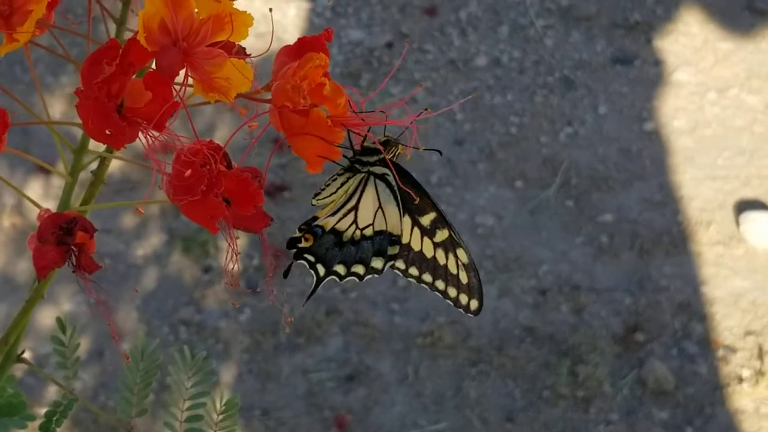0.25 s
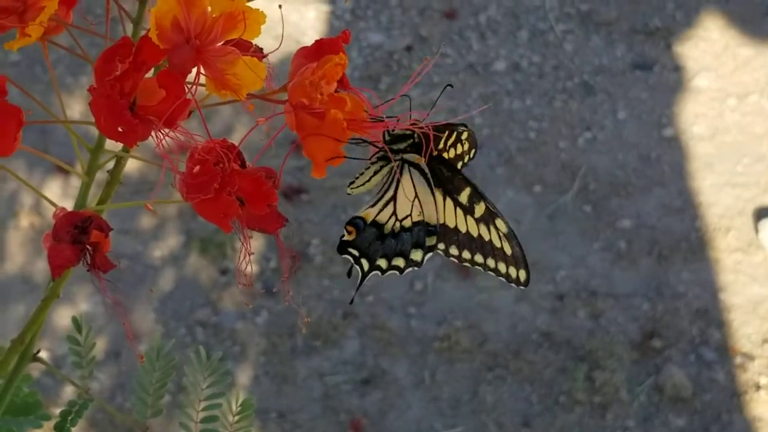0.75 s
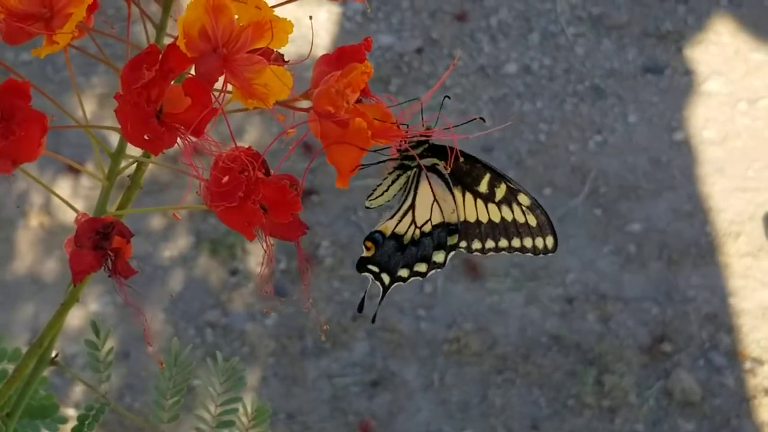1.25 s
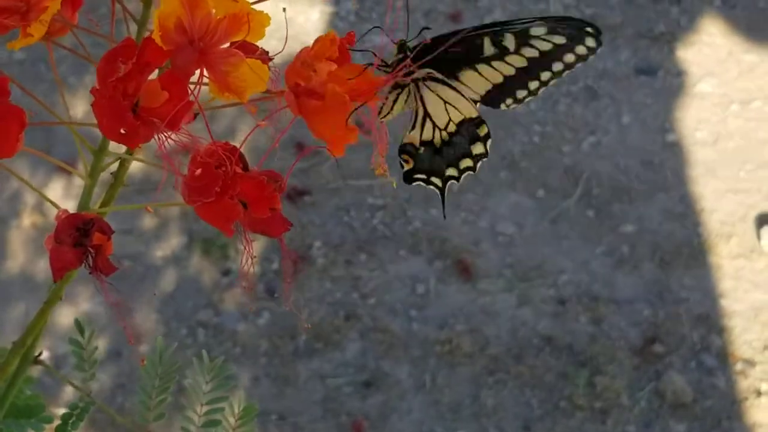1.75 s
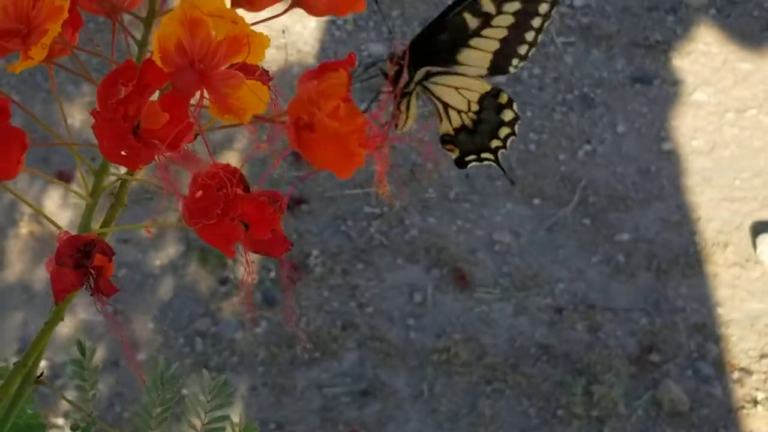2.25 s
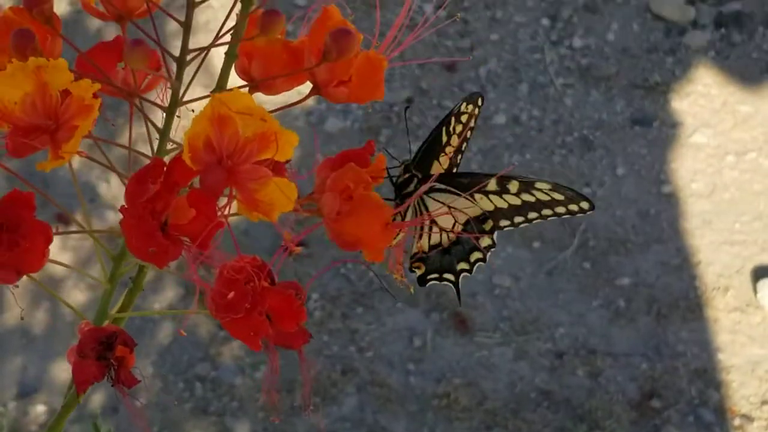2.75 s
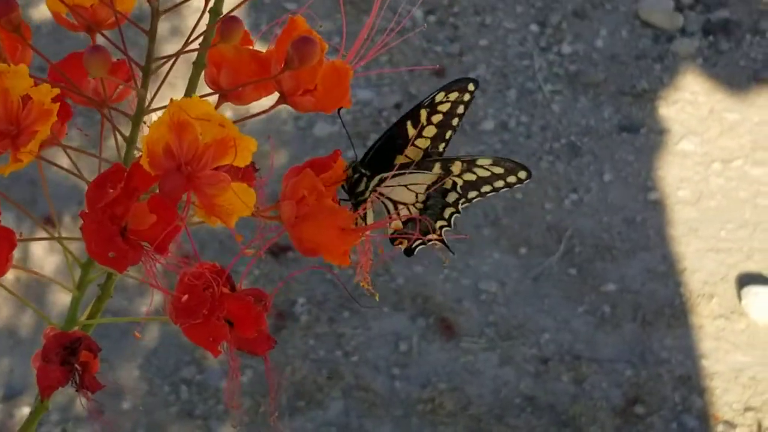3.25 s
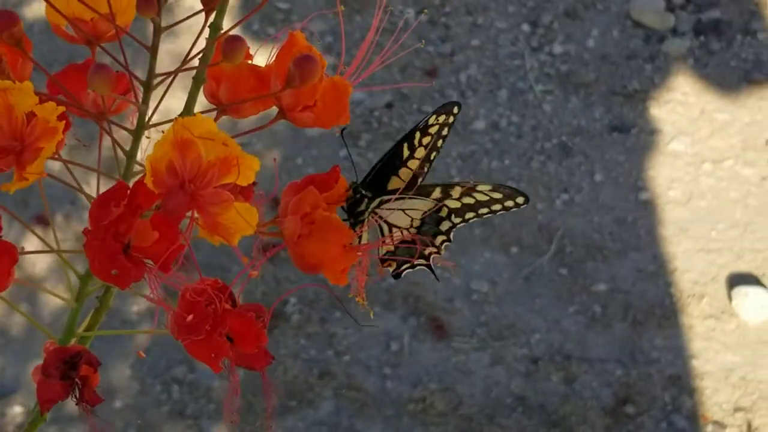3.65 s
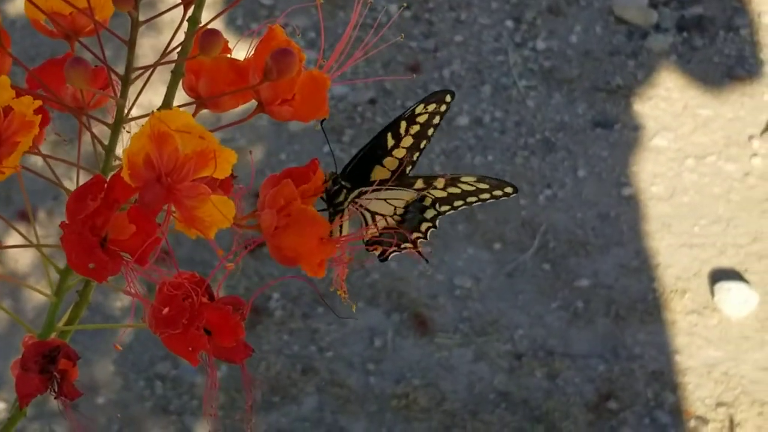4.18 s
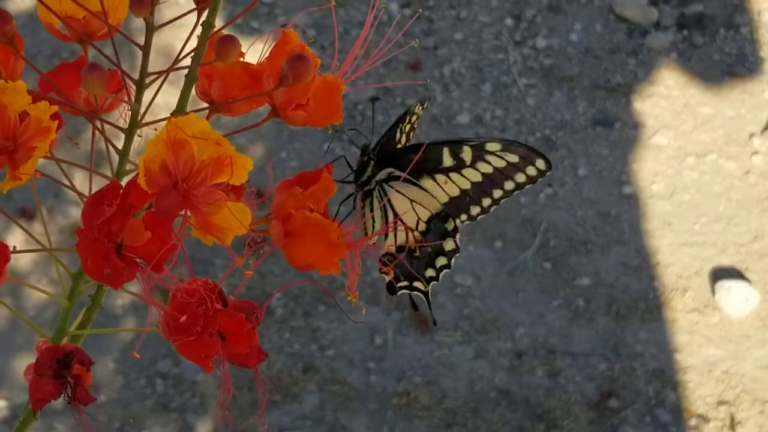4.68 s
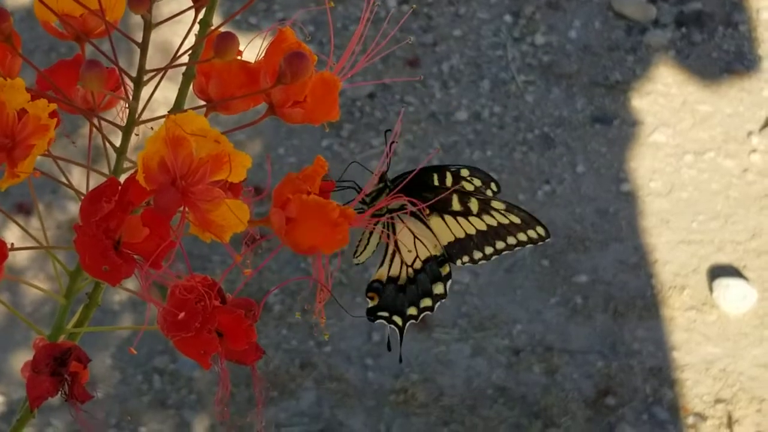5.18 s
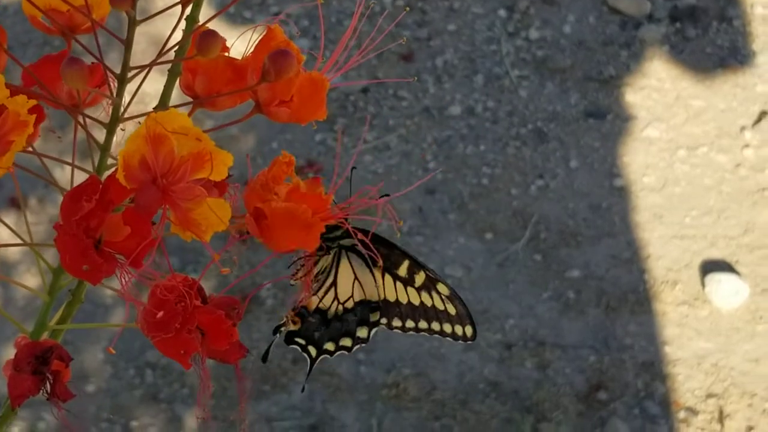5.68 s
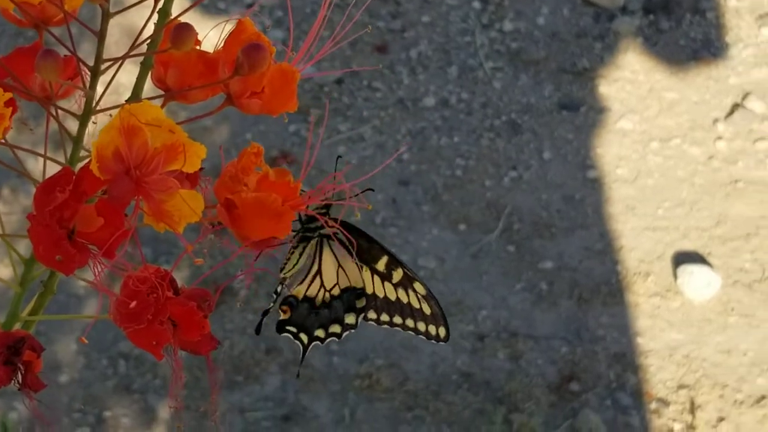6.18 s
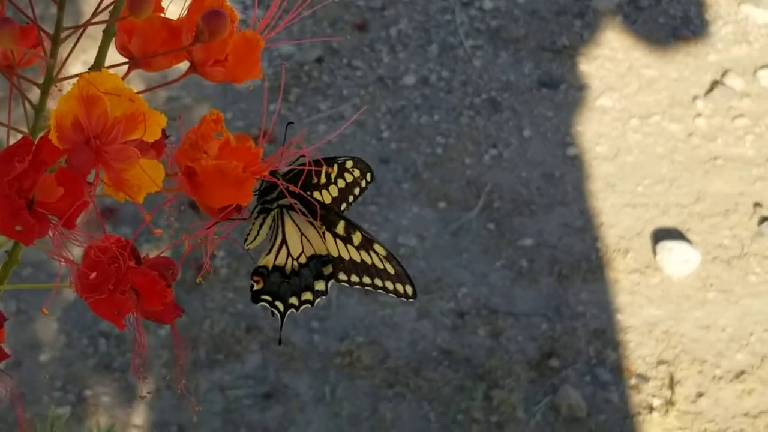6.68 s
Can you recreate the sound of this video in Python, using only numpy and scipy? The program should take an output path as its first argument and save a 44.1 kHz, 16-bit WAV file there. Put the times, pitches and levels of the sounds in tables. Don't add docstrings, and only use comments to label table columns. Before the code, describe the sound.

Outdoors near a road, a distant heavy engine drones up with a faint whine, lifts off at about one and a half seconds, changes gear and climbs softly again. Steady low traffic rumble lies under it. A nearer vehicle's tyre roar swells late and leans right. A faint leafy wash, light hiss and a few tiny ticks come through a small handheld stereo recorder.

```python
import sys
import numpy as np
from scipy import signal
from scipy.io import wavfile
from scipy.ndimage import uniform_filter1d

SR = 44100
rng = np.random.default_rng(int(sys.argv[2]) if len(sys.argv) > 2 else 0)


def transcribe(u):
    v = np.clip(np.atleast_2d(u).T, -1, 1)
    q = np.round(v * 32767).astype(np.int16)
    wavfile.write(sys.argv[1], SR, q)


def gain_from_decibels(decibels):
    exponent = np.asarray(decibels, float) / 20
    return 10 ** exponent


N = 305613

HOP, SIZE = 512, 2048
FRAMES = N // HOP + 6
HZ = np.fft.rfftfreq(SIZE, 1 / SR)
FRAME_S = np.arange(FRAMES) * HOP / SR
TIME_S = np.arange(N) / SR
STEP = 16
SLOW_S = np.arange(N // STEP + 1) * STEP / SR

# time in seconds, level in dB.
LOW_GEAR = [
    (0, -42.5),
    (.06, -39.5),
    (.23, -35.5),
    (.74, -32.5),
    (.92, -35.5),
    (1.2, -32),
    (1.315, -29.5),
    (1.47, -39),
    (1.57, -54.5),
]
# time in seconds, pitch in Hz, level in dB.
WHINE = [
    (0, 255.3, -56.1),
    (0.25, 271.2, -55.8),
    (0.5, 278.4, -51.5),
    (0.75, 286.2, -51.5),
    (1, 285.9, -49.6),
    (1.2, 282.9, -50.3),
    (1.35, 271.8, -52.6),
    (1.5, 272.0, -59.4),
]
# time in seconds, cycle rate in Hz.
NEXT_GEAR = [
    (1.6, 11.9),
    (2.1, 12.19),
    (4.1, 13.73),
    (4.6, 13.94),
    (5.1, 14.12),
    (5.6, 14.12),
    (6, 14),
]
# order, start in seconds, end in seconds, peak in dB.
LOW_ORDERS = [(8, 2.64, 3.75, -48.5), (8, 3.55, 4.82, -51), (8, 4.85, 5.68, -49.5), (10, 1.9, 3.1, -54),
              (10, 2.45, 2.9, -52), (10, 2.9, 3.64, -43), (10, 3.61, 4.07, -47), (10, 4.14, 4.6, -49),
              (10, 4.2, 5.85, -52.5), (11, 1.1, 3.3, -50), (11, 3, 4, -52.5), (11, 3.8, 5.2, -54.5)]
# order, start in seconds, end in seconds, peak in dB.
UPPER_ORDERS = [(22, 1.9, 3.8, -53.5), (22, 3.34, 4.7, -56.5), (19, 2.77, 4.25, -50), (21, 2.8, 3.5, -62),
                (21, 3.8, 5.9, -55), (20, 4.33, 5.86, -51.5), (18, 3, 5.6, -56.5), (19, 4.6, 5.9, -53)]
# time in seconds, depth in dB, half length in seconds.
ENGINE_DIPS = [
    (.35, 2, 0.17),
    (.79, 4, 0.031),
    (1.075, 3, 0.028),
    (1.415, 3, 0.018),
]

# frequency in Hz, density in dB per Hz.
RUMBLE = [(15, -38), (25, -20), (49, -1.5), (97, -3.5), (134, -2), (186, -10.5), (220, -10.5), (261, -6.5),
          (350, -18), (378, -14.5), (469, -23), (781, -33), (1000, -51.5), (1300, -73.5), (2200, -120)]
# time in seconds, change in dB, half length in seconds.
SURGES = [(0, -3.5, .1), (.9, -3, .1), (1.07, 4, 0.055), (2.0, 1.5, .4), (2.79, 2.5, .05),
          (3.35, -2.5, 0.49), (3.94, 4, .06), (4.7, 2, .15), (4.87, -2.5, .05), (5.1, 3.5, 0.17),
          (5.68, 5.5, 0.11), (5.84, -1, .04), (6.3, 1.5, 0.52), (6.93, 9, 0.046)]
# start in seconds, end in seconds, frequency in Hz, width in Hz, level in dB.
DRONES = [(1.6, 3.2, 56, 6, -51), (2.6, 4.2, 55, 6, -53), (3.9, 6, 55, 6, -50), (.4, 1.5, 93, 7, -52),
          (4.7, 6, 98, 9, -48), (2.6, 3.4, 204, 6, -58), (3.5, 5.6, 202, 8, -54), (5.4, 7.2, 204, 6, -56),
          (-.1, .5, 251, 8, -52), (1.4, 1.9, 252, 10, -49), (4, 5.9, 251, 8, -54), (5.8, 7.4, 249, 9, -50),
          (.6, 1.5, 385, 8, -63), (1.6, 2.6, 382, 8, -63), (3, 3.9, 390, 10, -60),
          (1.55, 2.15, 129, 10, -49.5)]

# frequency in Hz, density in dB per Hz.
TYRES = [(130, -30), (220, -10), (251, -7.5), (290, -17), (325, -4), (454, -14), (711, -13), (787, -9.5),
         (1020, -21), (1400, -19.5), (1900, -36), (2580, -40), (3540, -49), (4220, -45), (7000, -67.5),
         (9100, -99.5), (15400, -120)]
# frequency in Hz, width in Hz, level in dB.
TREAD = [(769, 43, 3), (600, 92, 0), (1142, 53, 2.5)]
# time in seconds, level in dB.
APPROACH = [(0, -73.5), (0.499, -78), (1, -68), (1.55, -67.5), (2, -65), (2.45, -61.5), (2.7, -66),
            (3.15, -60.5), (3.55, -64), (4.5, -60), (4.68, -61), (5.03, -56.5), (5.25, -56.5),
            (5.75, -55.5), (6.45, -53), (6.93, -50.5)]
# time in seconds, jump in dB.
BUMPS = [(2.12, 5), (2.443, 6), (2.757, 4), (3.067, 6), (3.26, 8), (3.387, 8), (3.53, 4), (3.889, 7),
         (4.25, 5), (4.306, 5), (4.549, 9), (4.741, 5), (4.95, 3), (5.03, 5), (5.2, 5), (5.788, 3),
         (6.212, 5), (6.391, 5), (6.488, 4)]

# frequency in Hz, density in dB per Hz.
AIR = [(530, -43.5), (900, -9), (959, -11), (995, -9.5), (1080, -5.5), (1650, -2), (1800, -6), (2090, -3),
       (2310, -8.5), (2530, -4), (3060, -9), (3780, -16.5), (4340, -10), (6600, -24.5), (8000, -34.5),
       (10400, -57), (17600, -120)]
# time in seconds, change in dB, half length in seconds.
BREEZES = [
    (0, 5, .03),
    (.7, 1.5, 0.17),
    (1.9, 2.5, 0.35),
    (2.85, 2, .1),
    (4.05, 2.5, 0.46),
    (5.27, 2.5, .15),
    (6.9, 4.5, .1),
]

# time in seconds, peak in dB, frequency in Hz, softness in ms.
TICKS = [
    (1.5933, -61, 13700, 1.4),
    (1.7363, -51.5, 13200, .5),
    (1.779, -65, 12500, .6),
    (1.7834, -63, 11400, 0.61),
    (6.8085, -62, 4200, 1.6),
    (6.8095, -68, 3400, 1.4),
    (6.811, -67, 2700, 1.4),
    (6.817, -68, 4220, 2.2),
]

# frequency in Hz, likeness 0 to 1, lead of the left in radians.
PORTS = [(29.8, 0.99, 0.54), (258, 0.93, 0.44), (423, 0.95, 0.31), (603, .85, 1.44), (760, 0.8, 0.86),
         (960, 0.5, 1.5), (1120, 0.7, 2.5), (1480, 0.9, 1.2), (1780, 0.8, 3.5), (2100, 0.6, 6),
         (2500, 0.5, 7.5), (3450, .5, 8), (4300, .4, 11), (7000, .2, 16.5)]
# frequency in Hz, left louder by dB.
SHADE = [(30, 6.8), (260, 6), (430, 4.3), (600, 9), (780, 6.5), (950, 2.5), (1120, 11), (1300, 16),
         (1460, 14.5), (1640, 11), (1850, 11), (2200, 16), (3450, 13), (4300, 17)]
# frequency in Hz, density in dB per Hz.
HISS = [(600, -9), (1300, -1.5), (2000, -5.5), (3000, -8), (5000, -8), (6700, -17), (8500, -17),
        (10000, -9), (11200, -3), (12300, 2.5), (14000, 2), (16500, 1)]


def evened(x):
    return x / np.sqrt(np.mean(abs(x) ** 2) + 1e-30)


def read(points, hz, column=1):
    table = np.transpose(points)
    return np.interp(np.log(hz + 1), np.log(table[0] + 1), table[column])


def humps(rows, s):
    return sum(db * np.exp(-((s - at) / span) ** 2) for at, db, span in rows)


def step(s, at, span):
    return 1 / (1 + np.exp(-(s - at) / span))


def swell(start, end):
    phase = np.clip((SLOW_S - start) / (end - start), 0, 1)
    return abs(np.sin(np.pi * phase)) ** 0.52


def wander(size):
    ticks_wide = max(size // STEP, 2)
    once = uniform_filter1d(rng.standard_normal(len(SLOW_S)), ticks_wide)
    return evened(uniform_filter1d(once, ticks_wide))


def tone(s, hz, db, waver=0.0013, fade_db=-0.25):
    inside = (SLOW_S >= s[0]) & (SLOW_S <= s[-1])
    pitch_hz = np.interp(SLOW_S, s, hz) * (1 + waver * wander(size=2000))
    level = gain_from_decibels(np.interp(SLOW_S, s, db) + fade_db * wander(size=3000))
    level = level * uniform_filter1d(inside * 1., size=90)
    turns = np.cumsum(pitch_hz) * STEP / SR + rng.random()
    return np.sqrt(2) * level * np.sin(2 * np.pi * turns)


def both_ports(bass):
    bass = signal.resample_poly(bass, STEP, 1)[:N]
    return np.array([bass * gain_from_decibels(2.5), np.roll(bass, shift=4) * gain_from_decibels(-3.0)])


def noise(gain, patchy_db, alike, louder_db, lead_rad):
    re, im, other_re, other_im, patches = rng.standard_normal((FRAMES, len(HZ), 5)).T
    patches = evened(uniform_filter1d(patches, size=14, axis=0))
    patches = evened(uniform_filter1d(patches, size=8, axis=1))
    alike = np.clip(alike, 0, 1)
    right_gain = gain_from_decibels(-louder_db)
    mean = np.sqrt(1 + right_gain ** 2 + 2 * right_gain * alike * np.cos(lead_rad)) / 2
    left = re + 1j * im
    shared = alike * left * np.exp(-1j * lead_rad)
    unshared = np.sqrt(1 - alike ** 2) * (other_re + 1j * other_im)
    pair = np.array([left, right_gain * (shared + unshared)])
    pair = pair * gain * gain_from_decibels(patchy_db * patches) / mean
    out = signal.istft(pair, nperseg=SIZE, noverlap=SIZE - HOP)[1][:, :N]
    power = np.mean(out.mean(0) ** 2)
    return out / np.sqrt(power / np.mean(gain ** 2) * np.mean(gain.mean(1) ** 2))


def outdoors(gain, patchy_db, diffuse=1, turn_db=0):
    alike = read(PORTS, HZ, 1)[:, None]
    lead_rad = read(PORTS, HZ, 2)[:, None]
    parting = 0.28 * np.clip(HZ / 1200, 0, 1) + np.exp(-((HZ - 1750) / 300) ** 2)
    louder_db = read(SHADE, HZ)[:, None] - turn_db * parting[:, None]
    return noise(gain, patchy_db, alike * diffuse, louder_db, lead_rad)


def low_gear():
    start_hz, top_hz, top_s, climb = 121.5, 134, .95, 1.6
    lift_s, lift_span_s, sag_hz = 1.3, .045, 5.5
    s = SLOW_S[SLOW_S < LOW_GEAR[-1][0]]
    hz = top_hz - (top_hz - start_hz) * np.clip(1 - s / top_s, 0, 1) ** climb
    hz = hz - sag_hz * step(s, lift_s, lift_span_s)
    db = np.interp(s, *np.transpose(LOW_GEAR)) - humps(ENGINE_DIPS, s)
    firing = tone(s, hz, db, waver=.001, fade_db=.2)
    octave = tone(s, 2 * hz, db - 22.0, fade_db=2.5)
    whine = tone(*np.transpose(WHINE), waver=.003, fade_db=1.8)
    return firing + octave + whine


def next_gear():
    s, cycle_hz = np.transpose(NEXT_GEAR)
    out = 0
    for k in (8, 10, 11):
        power = 0
        for order, start, end, db in LOW_ORDERS:
            if round(order) == k:
                power = power + (gain_from_decibels(db) * swell(start, end)) ** 2
        out = out + tone(s, k * cycle_hz, 0 * s) * np.sqrt(power)
    for order, start, end, db in UPPER_ORDERS:
        out = out + tone(s, round(order) * cycle_hz, db + 0 * s, fade_db=2.5) * swell(start, end)
    return out


def engine():
    return both_ports(low_gear() + next_gear())


def traffic():
    body_follows = 0.37
    body = np.clip(np.log2(HZ / 90 + 1e-9), 0, 1)[:, None]
    swell_db = (1 - body * (1 - body_follows)) * humps(SURGES, FRAME_S) + 0.8 * body
    rumble = gain_from_decibels(-43.0) * outdoors(gain_from_decibels(read(RUMBLE, HZ)[:, None] + swell_db), 0.54)
    drones = 0
    for start, end, hz, width_hz, db in DRONES:
        fuzz = 0.4 * wander(size=int(SR / width_hz / 2)) + 1
        phase = 2 * np.pi * hz * SLOW_S + wander(size=int(SR / width_hz))
        drones = drones + gain_from_decibels(db) * fuzz * np.cos(phase) * swell(start, end)
    return rumble + both_ports(drones)


def tread_power():
    return sum(gain_from_decibels(db) ** 2 / (1 + ((HZ - hz) / (width_hz / 2)) ** 2) for hz, width_hz, db in TREAD)


def tyres():
    near = step(FRAME_S, 5.85, .25)
    turn_db = -2.1 + 8 * near
    octaves = np.log2(HZ / 900 + .01)[:, None]
    tilt_db_per_octave = 0.02 + 0.4 * near
    shape = gain_from_decibels(read(TYRES, HZ)[:, None] + tilt_db_per_octave * octaves)
    shape = shape * np.sqrt(1 + tread_power())[:, None]
    jumps_db = sum(db * (SLOW_S > s) * np.exp(-abs(SLOW_S - s) / .012) for s, db in BUMPS)
    flicker_db = 1.2 * wander(size=300) + .4 * wander(size=2500) + jumps_db
    flicker = np.interp(TIME_S, SLOW_S, gain_from_decibels(flicker_db))
    level = gain_from_decibels(np.interp(TIME_S, *np.transpose(APPROACH)) + 2.0)
    return outdoors(shape, 0.71, turn_db=turn_db) * level * flicker


def air():
    upper = np.clip((HZ - 3000) / 800, 0, 1)[:, None]
    swell_db = 1.6 + humps(BREEZES, FRAME_S) * (1 - .4 * upper) - 1.4 * upper
    return gain_from_decibels(-74.5) * outdoors(gain_from_decibels(read(AIR, HZ)[:, None] + swell_db), 1.6, diffuse=.8)


def hiss():
    gain = gain_from_decibels(read(HISS, HZ))[:, None] * np.ones(FRAMES)
    return gain_from_decibels(-74) * noise(gain, .5, alike=0, louder_db=2.4, lead_rad=0)


def ticks():
    out = np.zeros((2, N))
    t = np.arange(600) / SR
    port_gain = gain_from_decibels(np.array([[4.0], [-10.0]]))
    for s, db, hz, softness_ms in TICKS:
        u = t / (.4 * softness_ms / 1000)
        snap = gain_from_decibels(db) * u * np.exp(1 - u) * np.sin(2 * np.pi * hz * t)
        at = round(s * SR)
        out[:, at:at + len(t)] += snap * port_gain
    return out


def scene():
    return engine() + traffic() + tyres() + air() + ticks()


def band_limit(x):
    return signal.sosfilt(signal.butter(12, 15690, fs=SR, output="sos"), x)


def record(dry):
    bass_cut = signal.butter(3, 44.0, "highpass", fs=SR, output="sos")
    heard = signal.sosfilt(bass_cut, dry) + hiss()
    fade_in = TIME_S / .006
    fade_out = .6 + (TIME_S[-1] - TIME_S) / .002
    return band_limit(heard * np.clip(np.minimum(fade_in, fade_out), 0, 1))


dry = scene()
out = record(dry)
transcribe(out)
```